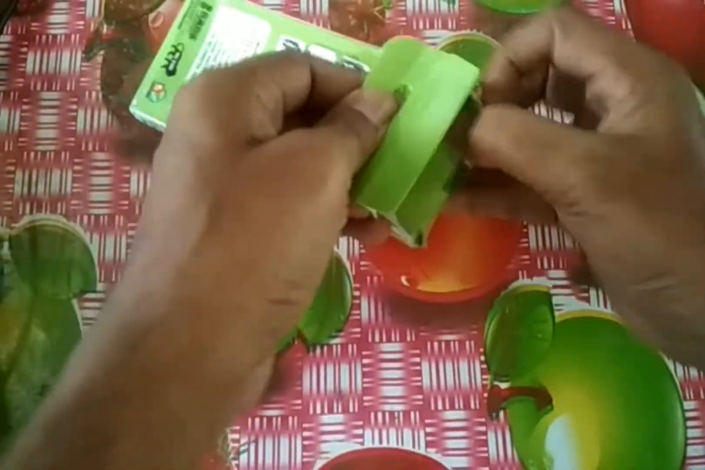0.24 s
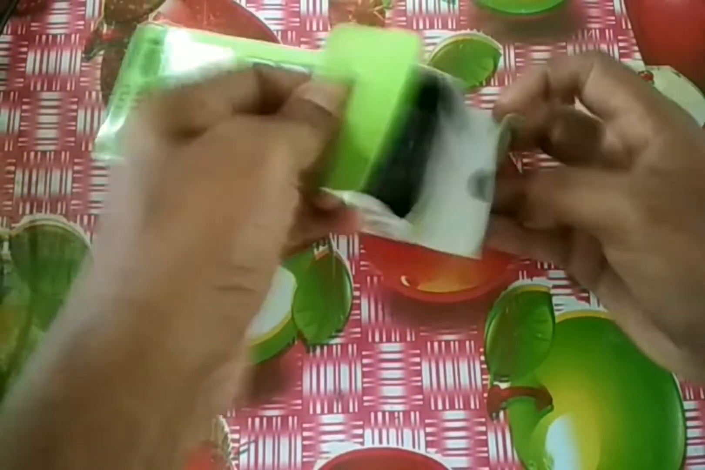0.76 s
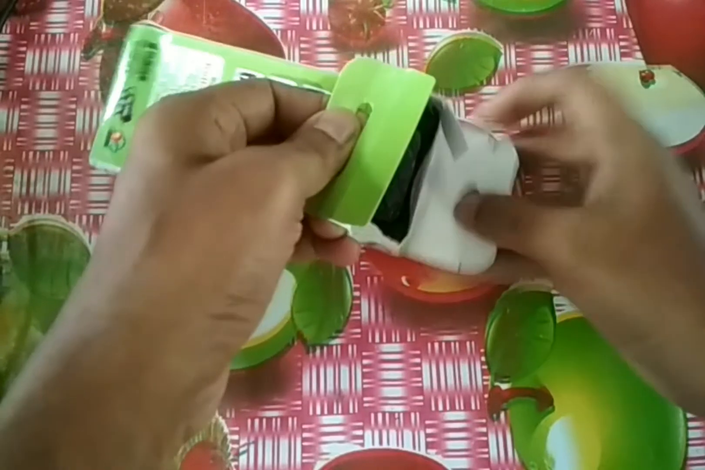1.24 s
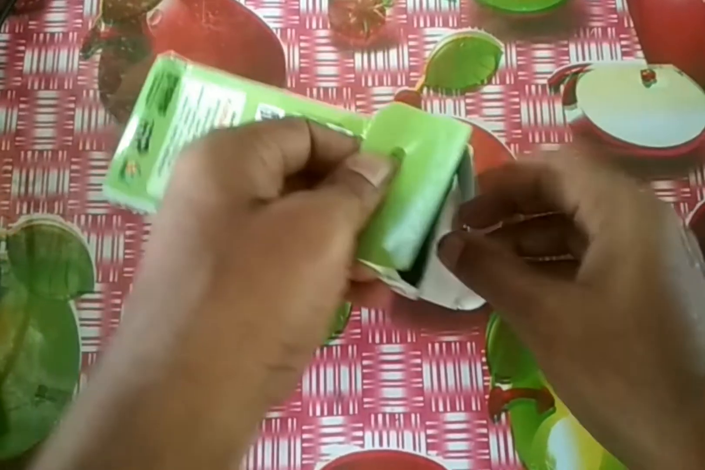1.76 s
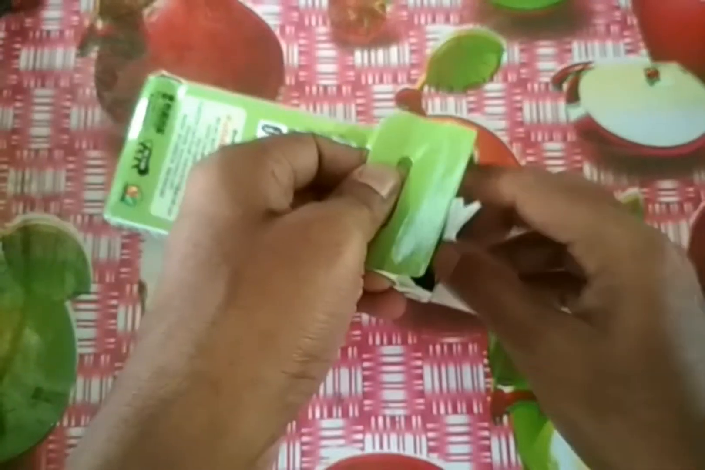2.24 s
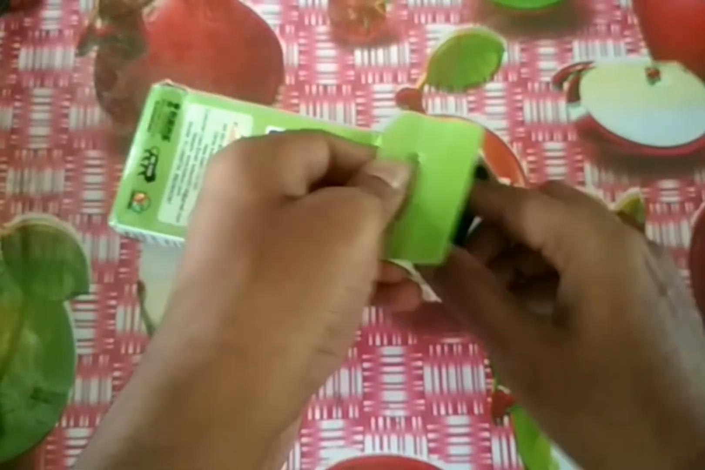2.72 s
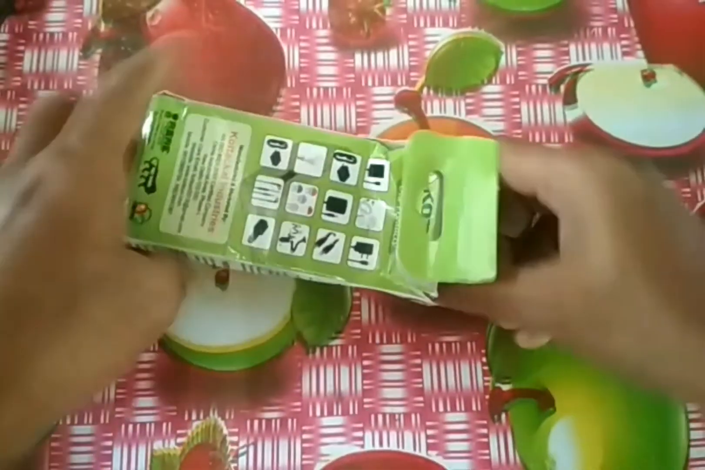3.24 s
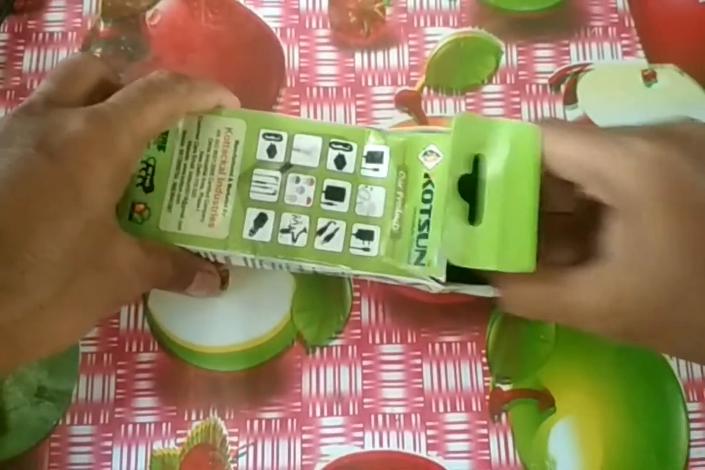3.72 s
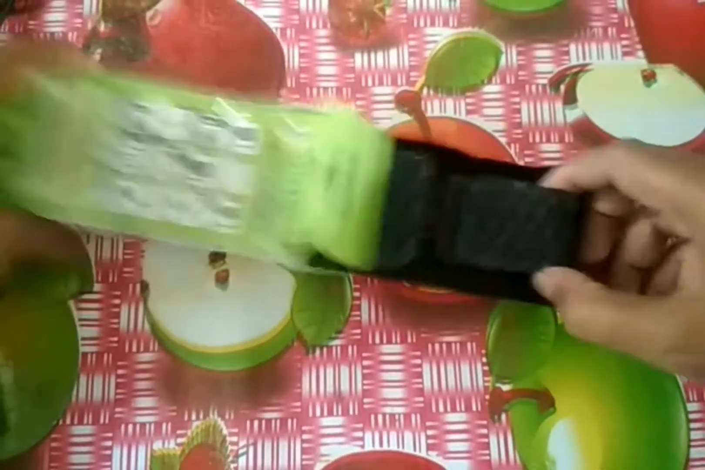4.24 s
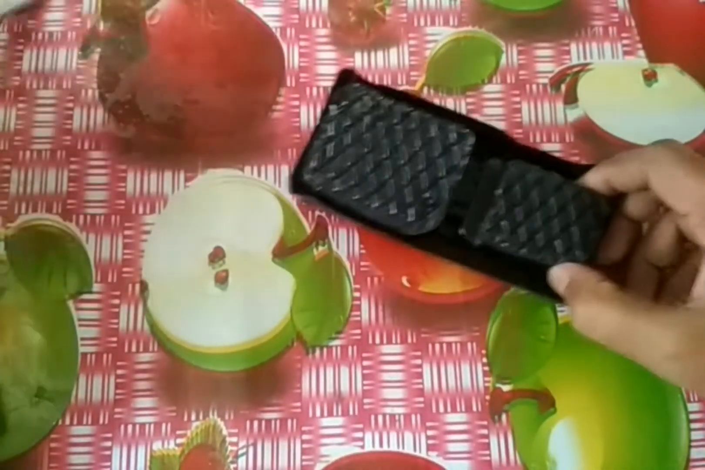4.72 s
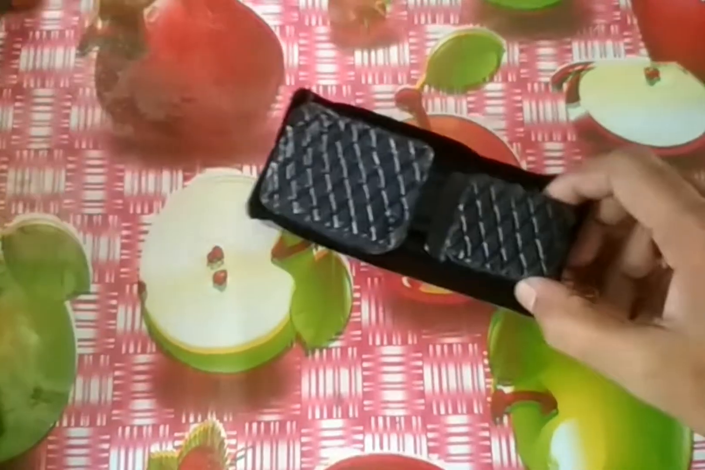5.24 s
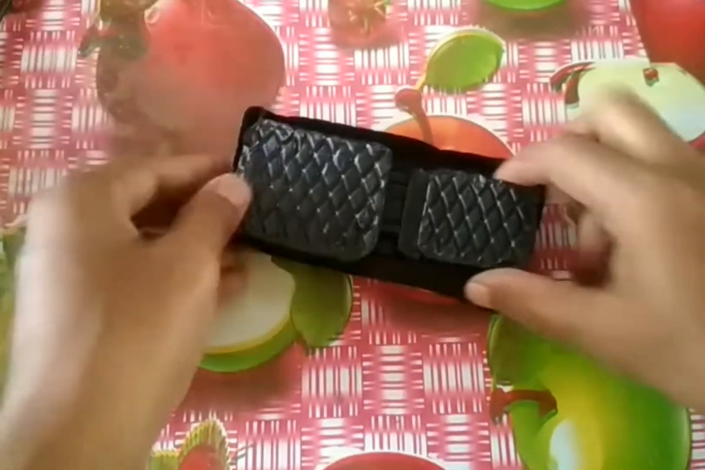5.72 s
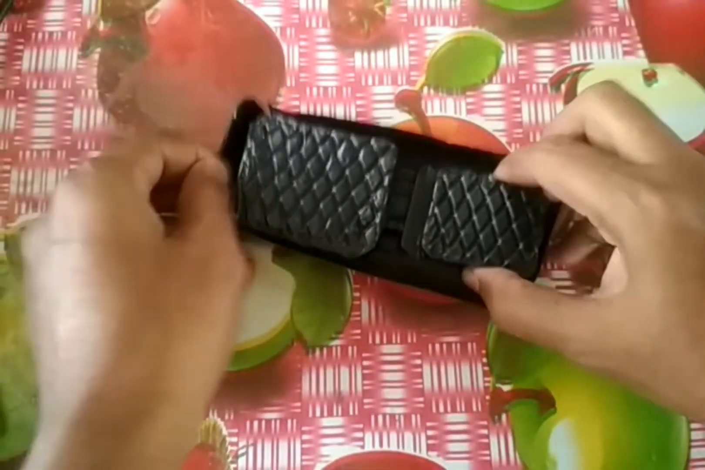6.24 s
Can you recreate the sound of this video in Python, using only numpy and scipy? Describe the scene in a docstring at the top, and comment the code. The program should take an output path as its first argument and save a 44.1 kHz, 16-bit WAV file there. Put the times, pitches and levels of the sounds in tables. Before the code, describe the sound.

Cardboard flaps scrape in short strokes and buckle with dry pops, close to the microphone. Light plastic clicks and skin creaks continue until a long grainy slide draws out a tray, briefly squeaking. The emptied box clunks and booms softly, a near pause follows, then gentle ticks, rubs and a bright tap of plastic over a murmuring tabletop. Short room echo, low rumble and faint hiss.

```python
"""In a small hard-walled room, hands open a small cardboard box over a table, heard close up at two ports.
Flaps scrape as filtered noise in strokes and pop as short bursts and damped modes; fingernails tick at the plastic.
One long pull draws the tray out: rough grains of noise ring the box, and a wavering sine squeaks twice.
The emptied box booms through a resonance, then the tray is set down and handled on the murmuring table.
Decaying noise makes the room's echoes; a low rumble and a faint hiss lie beneath."""
import sys
import numpy as np
from scipy import signal
from scipy.fft import rfft, irfft, next_fast_len
from scipy.io import wavfile
from scipy.ndimage import uniform_filter1d, map_coordinates

SR = 44100
rng = np.random.default_rng(int(sys.argv[2]) if len(sys.argv) > 2 else 0)


def unload_wav(signal):
    """Save mono or channel-first audio to the path in sys.argv[1] as 16-bit WAV at rate SR, clipped to [-1, 1]."""
    wavfile.write(
        sys.argv[1],
        SR,
        np.round(np.clip(np.atleast_2d(signal).T, -1, 1) * 32767).astype(np.int16),
    )


N = 285327
HIT = SR // 8  # samples given to one hit
LEAD = 0.01  # seconds from the start of a hit to its peak
FREE_S = 4.58  # from here on the hands hold only the tray
ATTACK_S, RELEASE_S = 0.0047, 0.01  # shortest time constants of a stroke taking hold and letting go

# Modes of the plastic tray. Each row: frequency in Hz, relative level in dB, t60 in seconds.
TRAY_MODES = [(807, -4.5, 0.006), (1293, 3.5, 0.037), (1541, -2.5, 0.026), (2044, -5, .013),
              (2820, -6.5, .01)]
# Drone of a rubbed card panel. Each row: frequency in Hz, relative level in dB per Hz.
PANEL_COLOUR = [(200, -17), (350, -11), (620, -6), (1100, 3.5), (1500, -5), (1850, -4.5), (2900, -11.5),
                (3600, -20), (8000, -56)]
# Hiss of a rubbed surface. Each row: frequency in Hz, relative level in dB per Hz.
HISS_COLOUR = [(1200, -33.5), (3000, -9.5), (4500, -5), (8000, -4), (9500, 1), (11000, 6), (13000, -1.5),
               (16000, -10)]
# Bright crack of card, also its grit and creases. Each row: frequency in Hz, relative level in dB per Hz.
CRACK_COLOUR = [(300, -46), (1000, -7.5), (2000, -4.5), (3500, -5), (8000, -5.5), (10500, 1.5), (16000, -1)]
# Woody flex of the wall. Each row: frequency in Hz, relative level in dB per Hz.
WALL_COLOUR = [(150, -12.5), (650, 1.5), (2250, -2.5), (2900, -15.5), (8000, -48)]


def amp(db):
    """Decibels to gain."""
    return 10 ** (np.asarray(db) / 20)


def unit(x):
    """Scale to rms 1."""
    return x / np.sqrt(np.mean(x ** 2) + 1e-20)


def blow(x):
    """Scale a hit to the energy of 10 ms at rms 1."""
    return unit(x) * np.sqrt(SR / 100 / HIT)


def along(points, hz):
    """Interpolate (Hz, value) points on a log frequency axis."""
    f, v = np.transpose(points)
    return np.interp(np.log(hz + 1), np.log(f), v)


def curve(points):
    """Interpolate (seconds, value) points to one value per sample."""
    s, v = np.transpose(points)
    return np.interp(np.arange(N) / SR, s, v)


def wobble(rate):
    """A smooth random curve, rate knots a second."""
    knots = rng.standard_normal(int(N * rate / SR) + 4)
    return map_coordinates(knots, [np.arange(N) * rate / SR])


def filtered(x, response):
    """Multiply the spectrum of x by a response of frequency."""
    n = x.shape[-1]
    m = 2 * next_fast_len(n // 2 + 2048)  # even, with room for the filter to ring out
    return irfft(rfft(x, m) * response(np.fft.rfftfreq(m, 1 / SR)), m)[..., :n]


def coloured(x, spectrum):
    """Filter causally (minimum phase) with the gain of a spectrum."""
    def response(hz):
        cepstrum = irfft(np.log(amp(along(spectrum, hz))))
        half = len(cepstrum) // 2
        # folding the cepstrum forward in time makes the filter causal
        cepstrum[1:half] *= 2
        cepstrum[half + 1:] = 0
        return np.exp(rfft(cepstrum))
    return filtered(x, response)


def noise(size):
    """White noise at two ports, whose likeness depends on frequency through shared and opposed parts."""
    # Each row: frequency in Hz, left-right correlation.
    likeness = [(60, 1), (500, 0.69), (2500, 0.14), (14000, 1)]

    def mid_and_side(hz):
        angle = np.arccos(np.clip(along(likeness, hz), -1, 1)) / 2
        return np.array([np.cos(angle), np.sin(angle)])

    mid, side = filtered(rng.standard_normal((2, size)), mid_and_side)
    return np.array([mid + side, mid - side])


def grains(rate, spread_db, life, size=N):
    """Envelope of rms 1 from fibres catching at random, rate a second; power decays over life seconds."""
    strength = amp(spread_db * np.minimum(rng.standard_normal(size), 2.3))  # limits the random draw
    catches = (rng.random(size) < rate / SR) * strength ** 2
    power = signal.lfilter([1], [1, -np.exp(-1 / (life * SR))], catches)
    return unit(np.sqrt(power))


def fade(t60, rise):
    """Envelope of a hit: a short rise to its peak at LEAD, then decay."""
    t = np.arange(HIT) / SR - LEAD
    onset = 1 / (1 + (np.minimum(t, 0) / rise) ** 4)
    return amp(-60 * np.maximum(t, 0) / t60) * onset


def ring(hz, t60):
    """One damped mode, reaching the ports at slightly different phases."""
    phase = rng.uniform(0, 2 * np.pi) + rng.normal(0, 0.11, (2, 1))
    return np.sin(2 * np.pi * hz * np.arange(HIT) / SR + phase) * fade(t60, rise=0.0013)


def resonance(hz, centre, width):
    """Response of one resonance, 1 at its centre."""
    return 1j * hz * width / (centre ** 2 - hz ** 2 + 1j * hz * width)


def rung(x, modes):
    """What an object with these modes makes of the force x, at rms 1."""
    def body(hz):
        total = 0
        for k, (f, db, t60) in enumerate(modes):
            width = np.log(1000) / (np.pi * t60)  # Hz; a short ring makes a broad peak
            total = total + (-1) ** k * amp(db) * resonance(hz, f, width)  # signs alternate
        return total
    return unit(filtered(x, body))


def bounced(x, share):
    """Hand and table throw back a copy a moment later, which combs the sound differently each time."""
    delay = rng.uniform(0.000408, 0.0023)  # seconds
    return filtered(x, lambda hz: 1 + share * np.exp(-2j * np.pi * hz * delay))


def patchy(x, depth_db):
    """Random narrow peaks and dips drift through the rubbing, making its tone patchy."""
    z = signal.stft(x, nperseg=512)[2]
    field = rng.standard_normal(z.shape[1:])
    field = uniform_filter1d(field, size=3, axis=0)  # smooth across frequency
    field = uniform_filter1d(field, size=24, axis=1)  # smooth over time
    return signal.istft(z * amp(depth_db * unit(field)), nperseg=512)[1][:, :N]


def stroke(start, length, swell_db, attack=ATTACK_S, release=RELEASE_S):
    """Attack, hold, release: the pressure grows or eases steadily while the contact lasts."""
    t = np.arange(N) / SR - start
    held = np.clip(t, 0, length)
    edges = np.minimum(t, 0) / attack - np.maximum(t - length, 0) / release
    return amp(swell_db * (held / length - 0.5)) * np.exp(np.maximum(edges, -20))


def add(track, s, sound, pan_db):
    """Place a hit with its peak at time s, leaning left (positive) or right."""
    start = round((s - LEAD) * SR)
    part = track[:, start:start + HIT]
    part += (sound * amp([[pan_db / 2], [-pan_db / 2]]))[:, :part.shape[1]]


def knocks(crack_db=0.0, panel_db=-4, modes_db=-8.5, flex_db=-3, thump_db=-1):
    """A panel buckles: a crack, its own short note, a woody flex, modes of box or tray, a soft push of air."""
    # Flaps popping and the tray bumping. Each row: peak time in seconds, crack, panel body level in dB,
    # panel pitch in Hz, thump level in dB, left-right lean in dB; the mix settings trim the levels.
    bumps = [(0.3219, -24, -27.5, 910, -31.5, 2), (0.4669, -31, -28.5, 671.6, -41, 1),
             (0.684, -22.5, -19, 867, -49, -1), (0.71, -24, -22, 410, -28, 1),
             (1.069, -30.5, -31, 525, -71, 1), (2.665, -36.5, -39.5, 638, -42.5, 0),
             (3.001, -48, -40.5, 985, -70.5, 1), (3.26, -42, -44.5, 887, -68, -0.5),
             (3.367, -38, -38.5, 591, -45.5, 0), (3.467, -31, -32, 1100, -48, 3),
             (3.483, -32, -28.5, 1108, -48, 1), (3.632, -31.5, -47, 1280, -72, -2),
             (3.659, -26.5, -35.5, 997, -55.5, 1), (3.945, -35, -36.5, 374, -43.5, 1),
             (3.991, -29.5, -33, 1150, -53, 4), (4.087, -33, -28, 1460, -57.5, 2.5),
             (4.269, -23, -23.5, 902, -32.5, 2), (4.277, -32.5, -27.5, 1368, -47, 0),
             (4.375, -29, -35, 1520, -54.5, 0.5), (4.52, -28.5, -29.5, 1388, -43.5, 1.5),
             (5.319, -37.5, -38, 1077, -51, 2), (5.338, -39, -35, 1005, -42, 0),
             (5.365, -30.5, -34, 751, -31.5, -0.5), (5.407, -44, -44, 1020, -41, -1),
             (5.9492, -19.5, -26.5, 1437, -36.5, 1.5)]
    # Modes of the box. Each row: frequency in Hz, relative level in dB, t60 in seconds.
    box_modes = [(382.4, -10.5, 0.12), (640.6, 12, 0.012), (930, -9, .045), (1092, -5, .031),
                 (1437, -3, 0.041), (1815, -3, .047)]
    # Soft push of air. Each row: frequency in Hz, relative level in dB per Hz.
    thump_colour = [(25, -11), (180, -7.5), (300, -9), (450, -16), (1000, -57.5)]
    out = np.zeros((2, N))
    for s, crack, panel, hz, thump, pan in bumps:
        modes = box_modes if s < FREE_S else TRAY_MODES
        burst = bounced(noise(HIT), share=0.39) * fade(t60=0.028, rise=0.0032)
        edge = blow(coloured(burst, CRACK_COLOUR))
        note = blow(ring(hz, t60=0.013))
        # each bump excites the modes in its own balance
        shell = blow(sum(amp(db + rng.normal(0, 3.4)) * ring(f, t60) for f, db, t60 in modes))
        flex = blow(coloured(noise(HIT) * fade(t60=0.036, rise=0.00074), WALL_COLOUR))
        push = blow(coloured(noise(HIT) * fade(t60=0.029, rise=0.002), thump_colour))
        body = amp(panel_db) * note + amp(modes_db) * shell + amp(flex_db) * flex
        hit = amp(crack + crack_db) * edge + amp(panel) * body + amp(thump + thump_db) * push
        add(out, s, hit, pan)
    return out


def snaps(level_db=3, card_db=-16):
    """A nail slips off an edge: a brief, bright, spiky crackle that also taps the wall beneath."""
    # Fingernails and thin plastic snapping. Each row: peak time in seconds, level in dB before level_db,
    # length scale in seconds that stretches both rise and decay.
    ticks = [(0.157, -37, 0.0026), (0.204, -40, 0.0029), (0.232, -35, 0.0052), (0.366, -33, 0.0093),
             (1.098, -38.5, 0.0035), (1.562, -45, .005), (1.65, -46, 0.0026), (2.064, -51.5, 0.0051),
             (2.2, -35, 0.0034), (2.213, -37, 0.0094), (2.257, -39, .002), (2.351, -31, 0.0038),
             (2.397, -36.5, .003), (2.446, -36, 0.0085), (2.546, -34, 0.0034), (2.627, -34, 0.0084),
             (2.793, -35.5, 0.0044), (2.929, -46.5, .004), (3.387, -34.5, 0.0023), (3.435, -37.5, 0.0032),
             (3.447, -34.5, 0.005), (4.512, -31, 0.0024), (4.914, -50.5, 0.0047), (5.501, -33, 0.0042),
             (5.512, -33.5, 0.0065), (5.542, -39, .003), (5.611, -37, 0.002), (5.684, -35.5, 0.0052),
             (6.094, -45, 0.0015), (6.143, -34.5, 0.0042)]
    # Bright snap. Each row: frequency in Hz, relative level in dB per Hz.
    snap_colour = [(150, -11), (900, -24.5), (3000, -10.5), (5000, -0.5), (8000, -2.5), (10700, 10.5),
                   (16000, 0)]
    out = np.zeros((2, N))
    for s, db, length in ticks:
        crackle = grains(rate=3100, spread_db=4.5, life=0.00028, size=HIT)
        slips = noise(HIT) * crackle * fade(t60=5.6 * length, rise=0.42 * length)
        bright = blow(coloured(bounced(slips, share=0.94), snap_colour))
        tap = blow(coloured(slips, WALL_COLOUR))
        add(out, s, amp(db + level_db) * (bright + amp(card_db) * tap), rng.normal(0, 1))
    return out


def contact():
    """Levels of drone and surface hiss: the strokes add in power, and uneven pressure makes them flutter."""
    # Rubs of flaps and tray. Each row: start in seconds, length in seconds, drone level in dB,
    # surface hiss level in dB, swell over the stroke in dB; levels stand before flutter and mix trims.
    strokes = [(0, 0.12, -61.5, -48.5, 3), (0.247, 0.091, -45, -35.5, 6.5), (0.609, 0.12, -46, -43.5, 24),
               (0.703, 0.084, -45, -38, -11), (0.963, 0.058, -61, -59, -4.5),
               (1.062, 0.018, -43, -35.5, -4.5), (1.219, 0.27, -65.5, -59.5, -14),
               (1.523, 0.049, -55.5, -56, 4), (1.654, 0.088, -56.5, -54, -7),
               (1.789, 0.19, -59, -53.5, -0.5), (2.057, 0.025, -51.5, -50.5, -4),
               (2.18, 0.15, -59.5, -49.5, -2.5), (2.439, 0.04, -56, -46.5, -15),
               (2.535, 0.12, -55.5, -48, -2), (2.787, 0.12, -62.5, -52.5, -13),
               (2.994, 0.094, -58, -56.5, 4), (3.213, 0.27, -60, -57, -11.5), (3.47, 0.018, -35.5, -31, -3),
               (4.213, 0.08, -38, -38, 9.5), (4.326, 0.047, -43.5, -36, 7), (4.484, 0.046, -45, -42.5, 13),
               (4.692, 0.11, -74, -70.5, -12.5), (4.919, 0.087, -87, -65, -6),
               (5.205, 0.044, -62.5, -55.5, 5), (5.316, 0.037, -44.5, -45, 4), (5.405, 0.1, -54.5, -55, 24),
               (5.736, 0.28, -54, -50.5, 5), (5.942, 0.058, -56, -39, -11), (6.047, 0.61, -60, -62, 4),
               (6.294, 0.057, -61, -46.5, 10), (6.427, 0.036, -43.5, -43, 2)]
    ease = 0.079  # longer strokes start and end more gently, by this share of their length
    flutter_db, flutter_rate = 1, 66  # depth in dB per unit of wobble, knots a second
    power = np.zeros((2, N))
    for start, length, drone, hiss, swell in strokes:
        envelope = stroke(start, length, swell, ATTACK_S + ease * length, RELEASE_S + ease * length)
        power += np.outer(amp([drone, hiss]), envelope) ** 2
    return np.sqrt(power) * amp(flutter_db * wobble(flutter_rate))


def rubbing(drone_db=0, tray_db=0, hiss_db=-0.5, grit_db=-4):
    """Fingers and flaps rub: fine catches hiss and drive the card or the tray, coarse ones crackle on top."""
    drone, hiss = contact()
    catch = grains(rate=1000, spread_db=5, life=0.0019)
    force = noise(N) * catch
    card = amp(drone_db) * unit(coloured(force, PANEL_COLOUR))
    tray = amp(tray_db) * rung(force, TRAY_MODES)
    body = np.where(np.arange(N) / SR < FREE_S, card, tray)
    surface = unit(coloured(noise(N) * (catch + 1), HISS_COLOUR))
    coarse = grains(rate=170, spread_db=2.5, life=0.00064)
    grit = unit(coloured(noise(N) * coarse, CRACK_COLOUR))
    skin = hiss * amp(hiss_db) * unit(surface + amp(grit_db) * grit)
    return patchy(drone * body + skin, depth_db=4.5)


def pull():
    """Force of the long pull as a gain: the tray gets going, binds for a moment and picks up until free."""
    stall_s, stall_half_s, stall_db = 3.8, 0.11, -5  # centre and half width in seconds, dip in dB
    stall = np.exp(-((np.arange(N) / SR - stall_s) / stall_half_s) ** 2)
    effort = stroke(start=3.645, length=0.442, swell_db=0, attack=0.026, release=0.0055)
    return effort * amp(stall_db * stall)


def sleeve(level_db=-40, drone_db=-37.5, hiss_db=-33.5):
    """The tray's edges scrape roughly along the card in many uneven catches and ring the box."""
    # The box ringing around the sliding tray. Each row: frequency in Hz, relative level in dB, t60 in seconds.
    sleeve_modes = [(1070, 3.5, .0065), (2750, -8, 0.0023), (4460, -1.5, .03)]
    catch = grains(rate=1100, spread_db=5.0, life=0.0026)
    force = noise(N) * catch
    box = amp(level_db) * rung(noise(N) * catch, sleeve_modes)
    drone = amp(drone_db) * unit(coloured(force, PANEL_COLOUR))
    hiss = amp(hiss_db) * unit(coloured(force, HISS_COLOUR))
    return pull() * patchy(box + drone + hiss, depth_db=2.5)


def squeaks(pitch_hz=9950, waver_hz=60):
    """The sliding tray sticks and slips, locking briefly into a thin, unsteady whistle."""
    # Each row: centre in seconds, half length in seconds, level in dB.
    whistles = [(3.829, 0.012, -29), (3.908, 0.013, -32)]
    t = np.arange(N) / SR
    level = sum(amp(db) * np.exp(-((t - s) / half) ** 4) for s, half, db in whistles)
    cycles = np.cumsum(pitch_hz + waver_hz * wobble(120)) / SR
    return level * unit(np.sin(2 * np.pi * cycles))


def fingers(uneven_db=0.5, crease_db=-5.0):
    """Skin creeps on the card in tiny slips while the hands keep their hold, and creases crackle on top."""
    # Fingertips creeping on their hold. Each row: start in seconds, length in seconds, level in dB of the slips.
    grips = [(0, .6, -58), (1.639, 2.3, -57.5), (5.343, 1.3, -54)]
    # Skin on card. Each row: frequency in Hz, relative level in dB per Hz.
    skin_colour = [(200, -10), (450, -6.5), (650, -1.5), (1200, -3.5), (2200, -10.5), (4000, -23),
                   (10500, -10.5), (16000, -17.5)]
    level = sum(amp(db) * stroke(start, length, 0) for start, length, db in grips)
    creeping = grains(rate=280, spread_db=-2.0, life=0.0068)
    slips = unit(coloured(noise(N) * creeping, skin_colour))
    folding = grains(rate=41, spread_db=4.0, life=0.0007)
    creases = unit(coloured(noise(N) * folding, CRACK_COLOUR))
    return level * amp(uneven_db * wobble(4.1)) * (slips + amp(crease_db) * creases)


def hollow(x, level_db=2):
    """Once the tray is nearly out, the air in the box booms with every scrape and bump for a while."""
    near = stroke(start=3.92, length=0.7, swell_db=0)  # the emptied box is near
    return amp(level_db) * filtered(x * near, lambda hz: resonance(hz, centre=300, width=160) ** 2)


def table():
    """The tray shifts on the table, and the table top murmurs under it as modes driven by noise."""
    # The tray shifting on the table. Each row: time in seconds, level in dB.
    drag = [(4.3, -71.5), (5.3, -66), (5.37, -49), (5.55, -61), (5.7, -66), (5.8, -49.5), (6.0, -46),
            (6.28, -53.5), (6.47, -45)]
    # Modes of the table top. Each row: frequency in Hz, relative level in dB, t60 in seconds.
    table_modes = [(58.3, 1.5, .2), (145.3, -2, 0.059), (269, -1.5, 0.035), (432, -12.5, .012)]
    return amp(curve(drag)) * rung(noise(N), table_modes)


def tail(delay=0.006):
    """The walls answer after a short gap; each frequency dies at its own speed, and the bass is weak."""
    # Decay of the room. Each row: frequency in Hz, t60 in seconds.
    room_decay = [(150, 0.72), (1000, 0.26), (5000, 0.4), (16000, 0.28)]
    hz, t, z = signal.stft(noise(SR // 2), SR, nperseg=256)
    bass_cut = (hz / np.hypot(hz, 400))[:, None] ** 2
    dying = amp(-60 * t / along(room_decay, hz)[:, None])
    decay = signal.istft(z * bass_cut * dying, SR, nperseg=256)[1]
    decay = decay / np.linalg.norm(decay[0])
    return np.pad(decay, ((0, 0), (round(delay * SR), 0)))


def room(x, count=40):
    """Each of count slices of time gets a freshly drawn noise tail as its echo."""
    out = np.zeros((2, N + SR))
    for index in np.array_split(np.arange(N), count):
        echo = signal.fftconvolve(x[:, index], tail(), axes=1)
        out[:, index[0]:index[0] + echo.shape[1]] += echo
    return out[:, :N]


def rumble(level_db=1, hiss_db=-80):
    """The low background of the room as bass-heavy noise, and a faint steady hiss."""
    # Each row: time in seconds, level in dB before level_db.
    swell = [(0.0, -58), (0.8, -61), (3.3, -64), (5.1, -56.5), (6.47, -56.5)]
    # Low background. Each row: frequency in Hz, relative level in dB per Hz.
    low_colour = [(35, 0), (57, 2), (85, 2.5), (150, -2.5), (220, -15.5), (400, -32), (1400, -35),
                  (4000, -54)]
    hiss = amp(hiss_db) * unit(coloured(noise(N), HISS_COLOUR))
    return amp(curve(swell) + level_db) * unit(coloured(noise(N), low_colour)) + hiss


def scene(knock_room_db=-7, snap_room_db=-11.0, rub_room_db=-8.5):
    """Everything the hands do, dry and through the room, over the table and the background."""
    bumps, ticks = knocks(), snaps()
    slide = rubbing() + sleeve() + fingers() + squeaks()
    send = amp(knock_room_db) * bumps + amp(snap_room_db) * ticks + amp(rub_room_db) * slide
    return bumps + ticks + slide + hollow(bumps + slide) + room(send) + table() + rumble()


def record(dry, top_hz=16000):
    """The ports differ in level and phase at each frequency, and the band ends steeply at top_hz."""
    # Each row: frequency in Hz, left-right level difference in dB.
    tilt = [(160, 2), (270, 0.5), (450, 0.5), (740, -2.5), (1220, 0), (2010, -1.0), (3330, -0.5), (5500, 1),
            (9080, -5.5), (15000, 0.5)]
    # Each row: frequency in Hz, phase in radians by which left leads.
    skew = [(30, 0.94), (120, -0.006), (600, 0.65), (2000, -0.97), (4000, -1.11), (13000, -1.75)]
    side = np.array([[1], [-1]]) / 2  # each port takes half of the difference

    def ports(hz):
        gain = amp(side * along(tilt, hz))
        phase = np.exp(1j * side * along(skew, hz))
        return gain * phase * (hz < top_hz)

    return filtered(dry, ports)


dry = scene()
out = record(dry)
unload_wav(out)
```